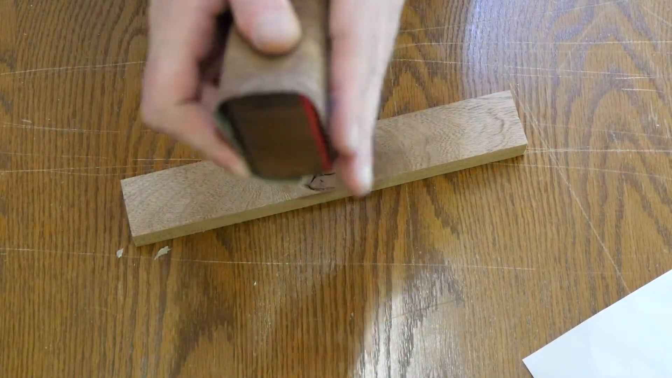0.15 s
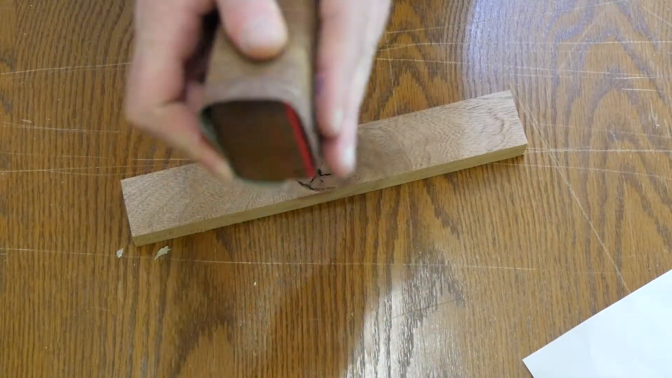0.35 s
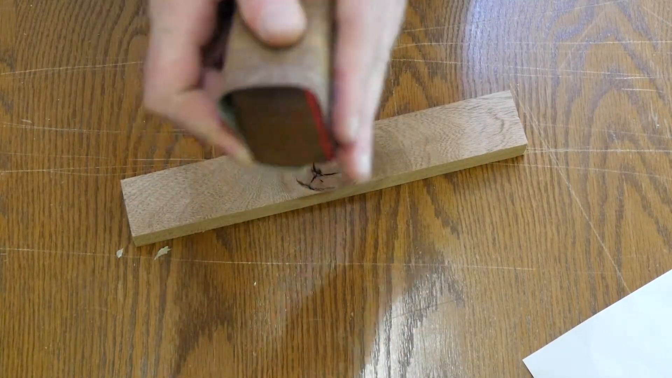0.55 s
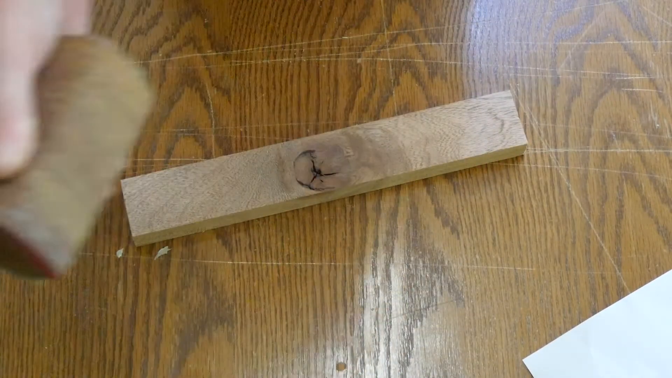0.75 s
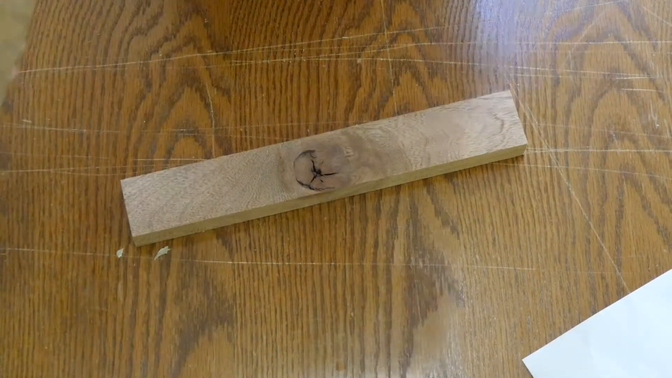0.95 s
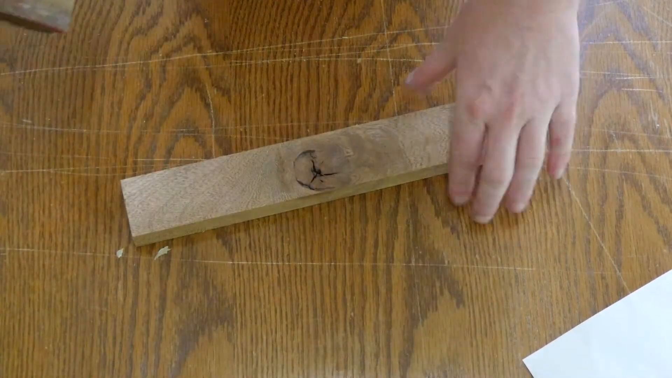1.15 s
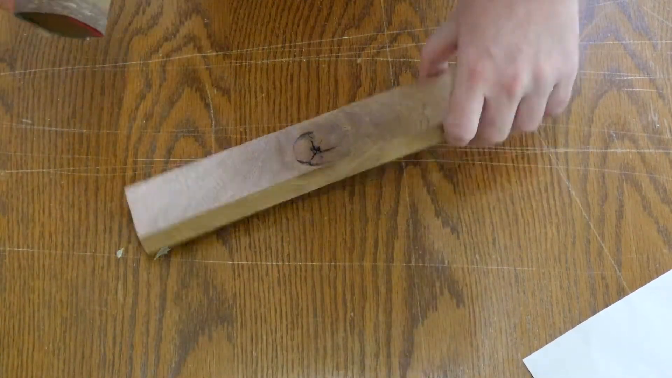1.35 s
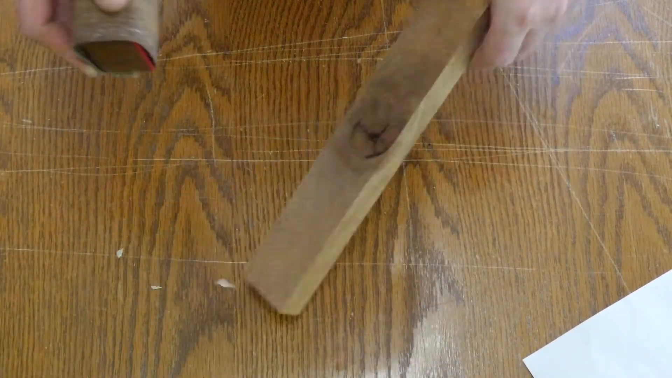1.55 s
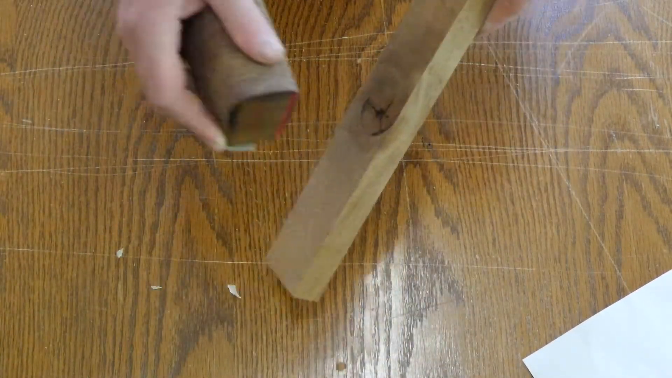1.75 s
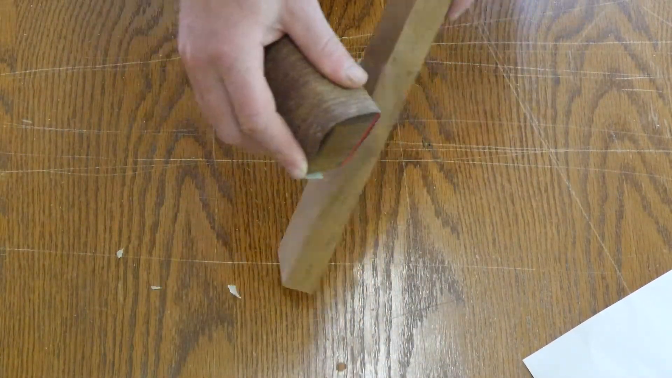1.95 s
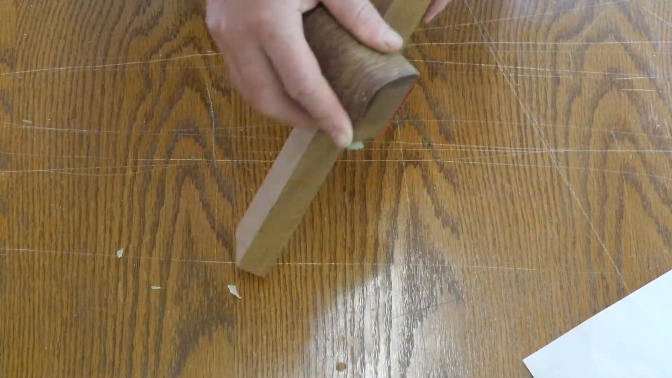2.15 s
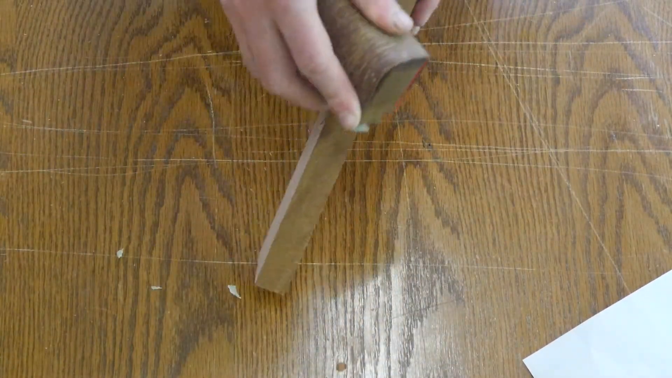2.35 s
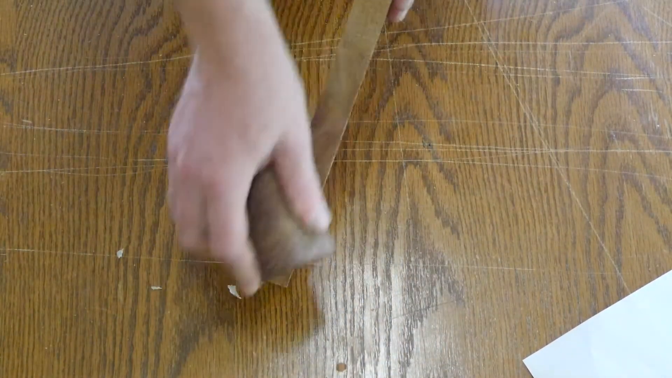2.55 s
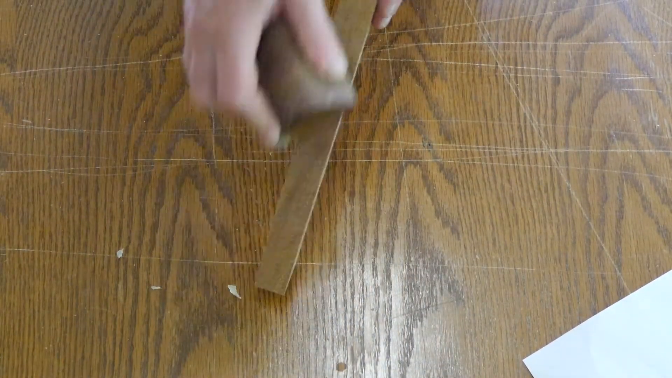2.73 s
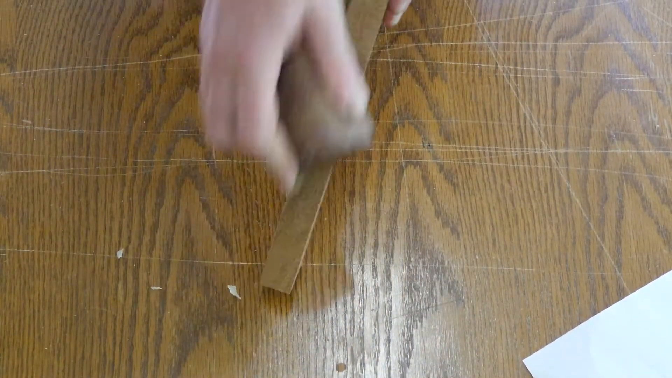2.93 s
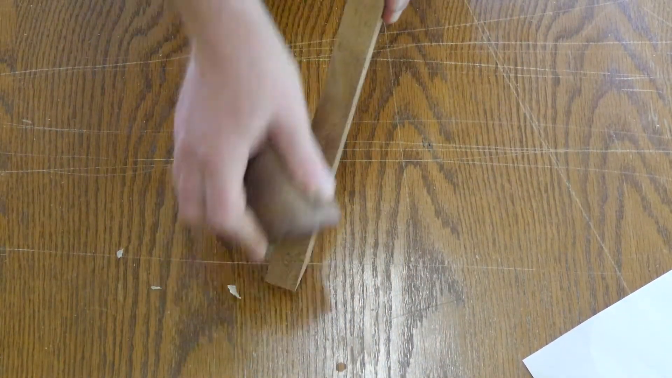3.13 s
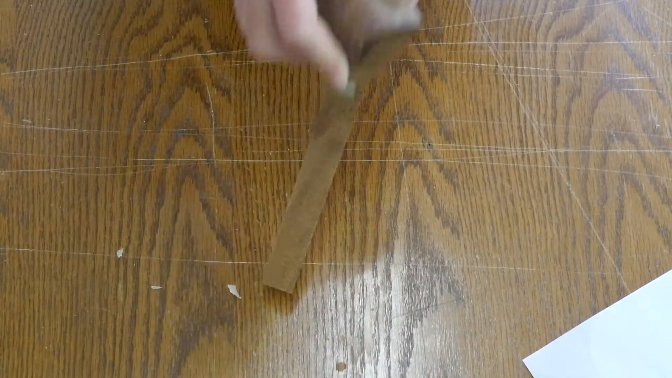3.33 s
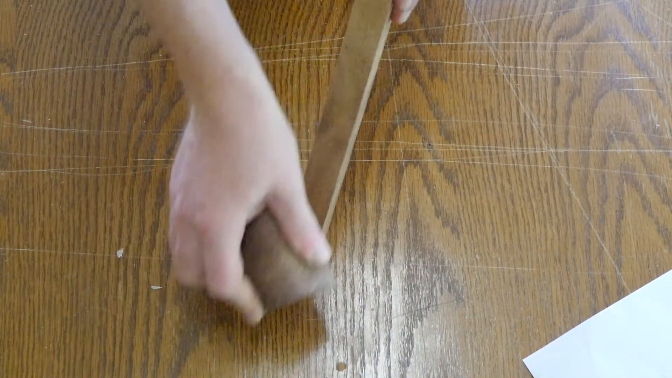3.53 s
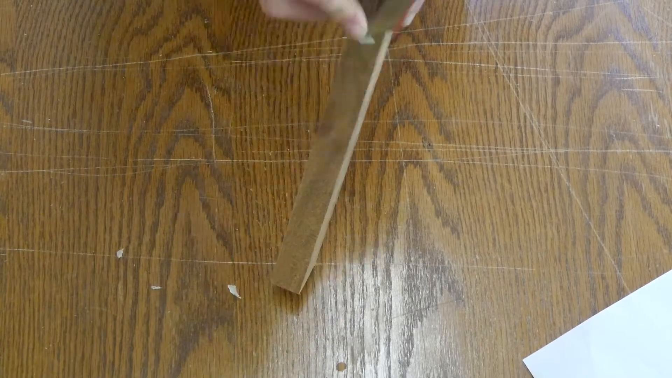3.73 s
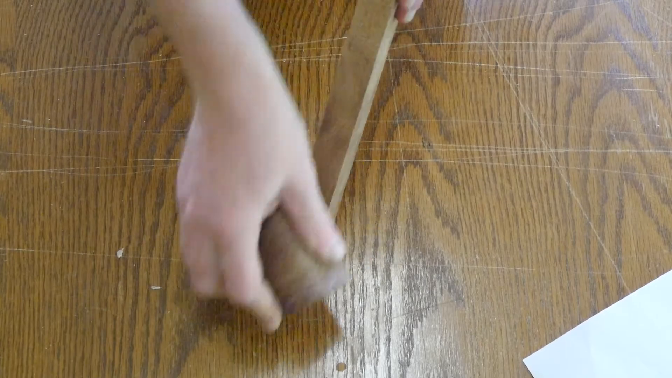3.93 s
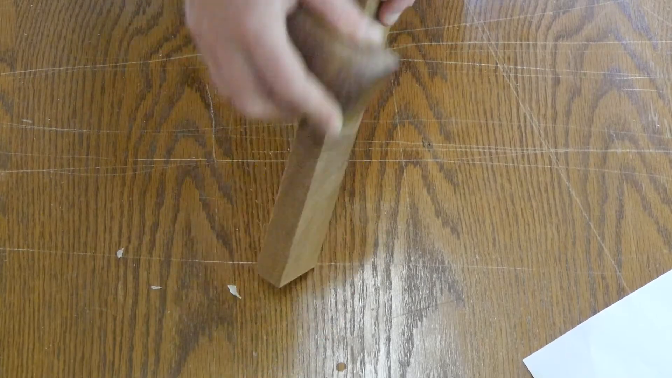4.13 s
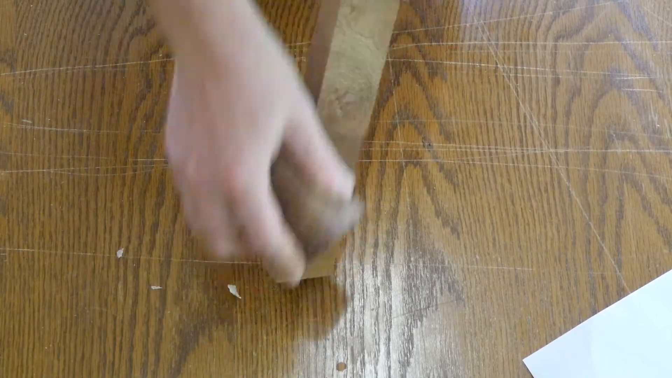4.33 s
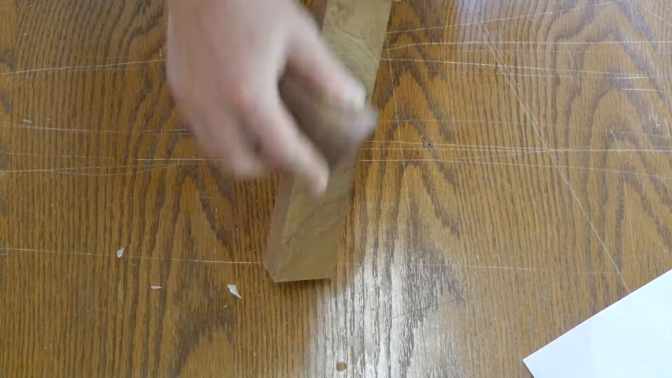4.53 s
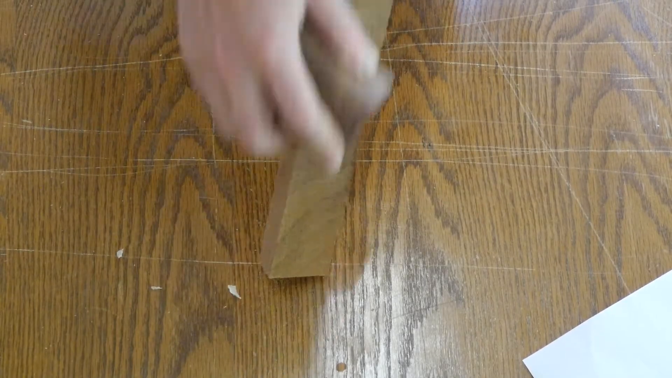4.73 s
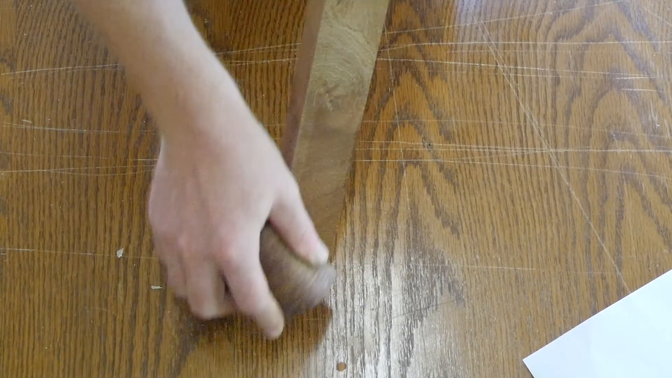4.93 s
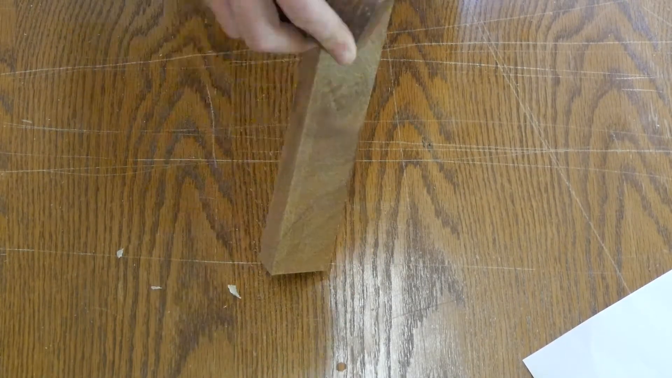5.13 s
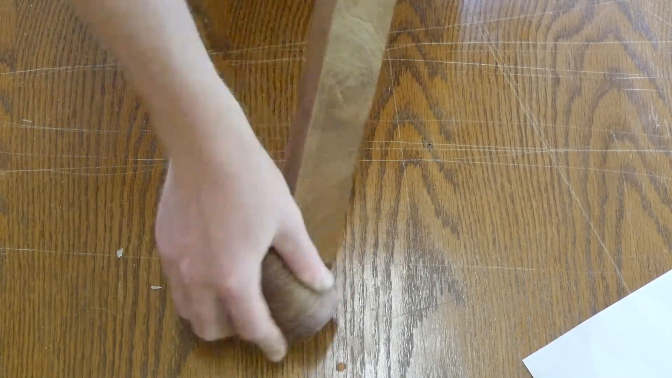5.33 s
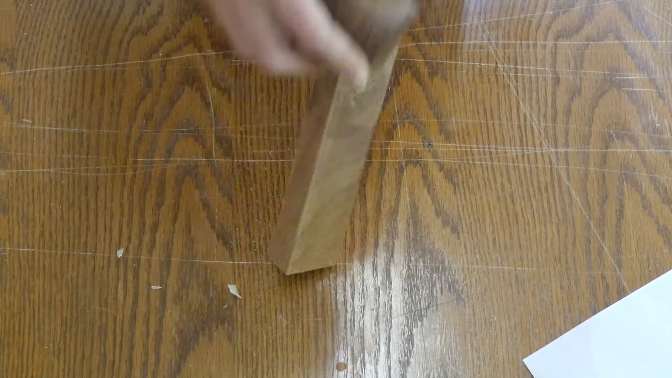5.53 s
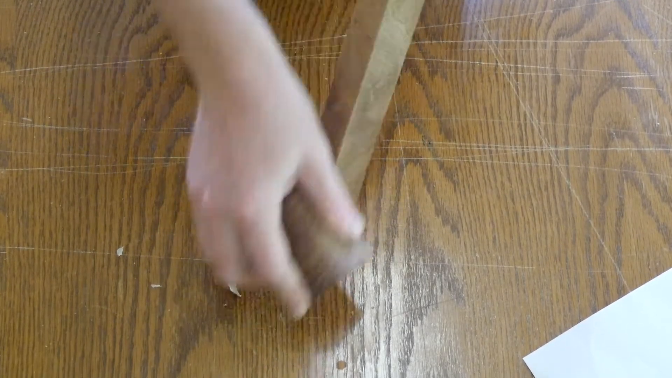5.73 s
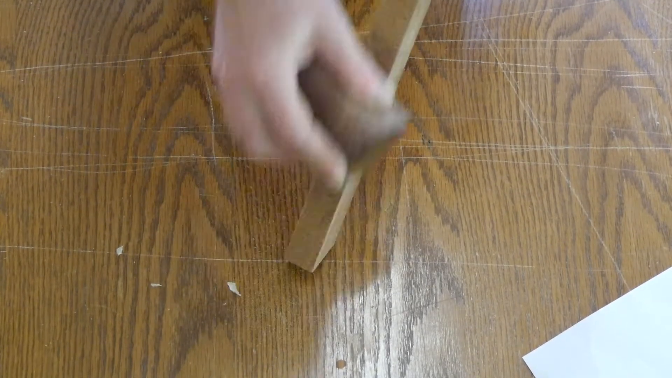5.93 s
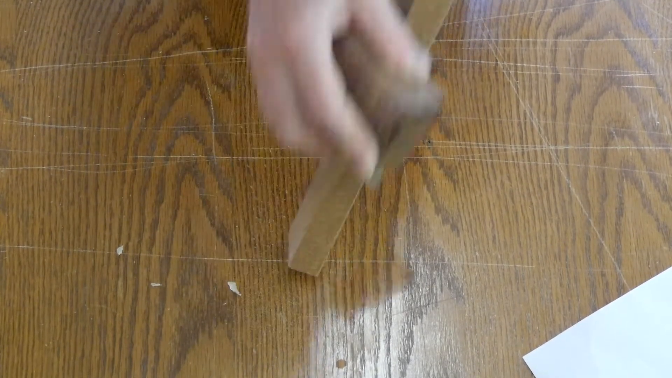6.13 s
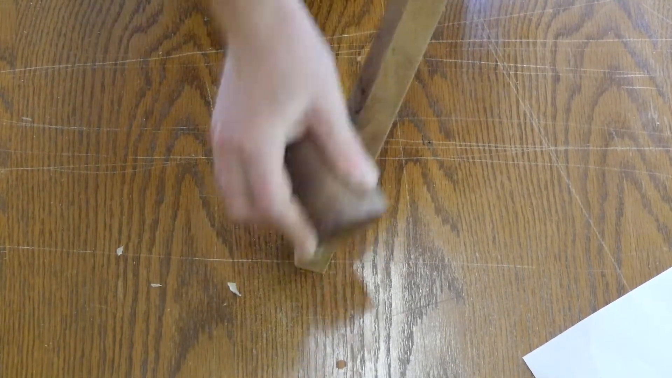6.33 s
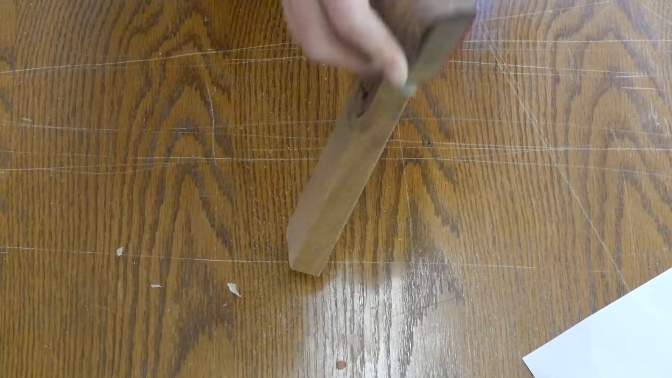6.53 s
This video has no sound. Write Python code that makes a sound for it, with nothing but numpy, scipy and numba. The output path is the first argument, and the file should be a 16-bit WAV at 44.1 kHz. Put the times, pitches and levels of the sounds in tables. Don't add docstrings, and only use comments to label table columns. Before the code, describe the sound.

A close microphone above a wooden table in a small, hard-walled workshop, with faint room tone. From 0.05 to 0.7 s a thumb brushes sandpaper in about seven short, dry, slightly hollow rubs, starting with a little tick; the last, near 0.6 s, is loudest and brightest. Near quiet follows. At 1.2-1.3 s come faint touches, then from 1.4 to 1.6 s a wooden strip's corner skids with small knocks and a stuttering scrape. At 1.8 s it is stood down with a loud, low woody knock. Around 2.15 s the block lands with a light gritty clack and shifts faintly. From 2.4 s to the end at roughly 6.6 s it strokes back and forth, about four strokes a second, hissing and rasping, brightest around 2.9-4.1 s, over a mid-pitched strip ring and low table hum. Softer thumps fall at 4.2 and 6.1 s, a strong knock at 5.3 s.

```python
import sys
import numpy as np
from scipy import signal
from scipy.fft import rfft, irfft, next_fast_len
from scipy.io import wavfile
from numba import njit

SR = 44100
rng = np.random.default_rng(int(sys.argv[2]) if len(sys.argv) > 2 else 0)


def field_ratio(decibels):
    return 10 ** (np.asarray(decibels, dtype=float) / 20)


def generate_wav(signal):
    frames = np.transpose(np.atleast_2d(signal))
    scaled = np.clip(frames, -1, 1) * 32767
    pcm = np.round(scaled).astype(np.int16)
    wavfile.write(sys.argv[1], SR, pcm)


N = 294588

# (start [s], share of the stroke at which the hand is fastest [0-1], grit hiss [dB], rasp [dB], strip ring [dB])
STROKES = [(2.388, 0.52, -29.5, -27, -18.5), (2.627, 0.42, -23.5, -22.5, -27),
           (2.865, 0.45, -20.5, -23.3, -23), (3.076, 0.49, -20, -23, -34), (3.316, 0.46, -21.5, -26, -30),
           (3.543, 0.49, -19, -25, -40), (3.775, 0.39, -20.5, -26, -51), (4.001, 0.51, -20.5, -26, -22),
           (4.236, 0.38, -26.5, -21, -24), (4.452, 0.51, -24.5, -23.5, -27), (4.693, 0.36, -24.5, -23, -28),
           (4.938, 0.62, -23.5, -25.5, -36), (5.158, 0.33, -24, -24.4, -27), (5.394, 0.63, -24, -26, -29.5),
           (5.623, 0.41, -24.5, -24, -25), (5.833, 0.39, -21.1, -28.5, -28),
           (6.066, 0.43, -24.5, -23.5, -36), (6.291, 0.39, -24, -26, -39), (6.532, 0.28, -22.5, -26, -37)]
# (frequency [Hz], level per Hz [dB])
GRIT_COLOUR = [(320, -76), (550, -5), (718, -9), (885, -1), (1060, 0.5), (1400, 5), (1810, 5), (2640, 0.5),
               (3080, 4), (6370, 0), (7860, 0), (10400, 5.5), (14500, -8.5), (15600, -5)]


def sanding():
    # (full at [s], fall by 20 dB [s], level [dB])
    landing = [
        (2.158, 0.19, -32),
        (2.195, 0.041, -40),
        (2.289, 0.058, -55),
    ]
    # (time [s], frequency [Hz])
    free_length = [(2.45, 1283), (2.75, 1460), (2.971, 1530), (3.2, 1390), (3.45, 1380), (3.66, 1500),
                   (3.9, 1350), (4.12, 1304), (4.35, 1406), (4.8, 1460), (5.05, 1410), (5.501, 1420),
                   (5.73, 1460), (5.95, 1360), (6.18, 1440), (6.6, 1490)]
    landing_hz = 1273

    place, through, speed = hand()
    strokes = range(len(STROKES))
    hiss_db, rasp_db, ring_db = (np.interp(place - 0.5, strokes, c) for c in np.transpose(STROKES)[2:])
    s, fall, db = np.transpose(landing)
    laid = swell(s, 0.002, 0, fall, db)

    free_hz = np.interp(np.arange(N) / SR, *np.transpose(free_length))
    free_hz = np.where(speed > 0, free_hz - 110 * np.cos(np.pi * through), landing_hz)
    upper_hz = np.where(speed > 0, 2450 + 200 * drift(10.3), 1.62 * landing_hz)

    grains = grit(20000.0, spread_db=-0.8, catch_db=1.0)
    spread = colour(grains, GRIT_COLOUR)
    rasp = signal.sosfiltfilt(signal.butter(1, 4300, fs=SR, output="sos"), spread)
    hiss = rms_one(spread - rasp)
    rasp = rms_one(rasp)
    upper = field_ratio(-7) * resonance(grains, upper_hz, 650.0)
    strip = field_ratio(-7.0) * resonance(grains, free_hz, 260.0)

    hiss_level = field_ratio(hiss_db - 1) * speed ** 3.08 + field_ratio(-28) * laid
    swelling_db = np.sin(2 * np.pi * (through - 0.5)) / 2
    rasp_level = field_ratio(rasp_db - 3 + swelling_db) * speed ** 1.17
    ring_level = field_ratio(ring_db - 1 + 5.5 * drift(11.0)) * speed ** 5.1 + field_ratio(2.5) * laid
    strokes_sound = hiss_level * hiss + rasp_level * rms_one(rasp + upper) + ring_level * strip
    return strokes_sound + laid * (upper + field_ratio(-11.5) * rasp)


def hand():
    last_stroke_s, start_s = 0.34, 0.016
    rest_speed = 0.28
    t, turns = np.arange(N) / SR, np.array(STROKES)[:, 0]
    place = np.interp(t, np.append(turns, turns[-1] + last_stroke_s), np.arange(len(turns) + 1.))
    which = np.minimum(place.astype(int), len(turns) - 1)
    through = place - which
    fastest = np.array(STROKES)[which, 1]
    arc = np.where(through < fastest, through / fastest, (1 - through) / (1 - fastest))
    speed = rest_speed + (1 - rest_speed) * np.sin(np.pi / 2 * arc)
    return place, through, speed * np.clip((t - turns[0]) / start_s, 0, 1)


def table():
    # (frequency [Hz], level [dB], fade by 60 dB [s])
    top_modes = [(141.7, -19, 0.18), (181.6, -10.5, 0.47), (251.4, -18, 0.42), (291.6, 0.5, 0.45),
                 (321.4, -2, 0.21), (369.4, -3.5, 0.18), (456, -48, 0.14), (516.6, -12.5, 0.42),
                 (623, -11, 0.026), (900, -19, 0.15), (1000, -13, 0.1), (1160, -34, 0.059),
                 (1650, -11, 0.052), (1960, -32, 0.028), (2310, -39, .03)]
    # (time [s], peak [dB], hardness of the contact [Hz])
    top_knocks = [(1.217, -32, 900.0), (1.264, -29, 900.0), (1.392, -19, 900.0), (1.498, -19.5, 900.0),
                  (1.803, 6, 980), (2.056, -18, 600.0), (2.313, -31, 900.0), (2.894, -50.5, 900.0),
                  (3.783, -27, 900.0), (4.188, -14.5, 900.0), (4.498, -49, 900.0), (5.324, 4.5, 810),
                  (6.141, -14, 900.0)]

    judder = grit(1500.0, spread_db=-0.5, catch_db=1.0)
    hum, knocks = np.zeros(N), np.zeros(N)
    for hz, db, t60 in top_modes:
        hum += field_ratio(db + 3.5 * drift(3.06)) * rms_one(ring(judder, hz, 0.5 * t60))
    for s, peak_db, hard_hz in top_knocks:
        at = round((s + 0.00326) * SR)
        click = np.zeros(min(SR // 2, N - at))
        click[0] = field_ratio(peak_db - 13.0)
        struck = np.zeros(len(click))
        for hz, db, t60 in top_modes:
            struck += field_ratio(db + rng.normal(0, 1.0)) * ring(click, hz, 0.5 * t60)
        soft = signal.butter(2, hard_hz, fs=SR)
        knocks[at:at + len(click)] += signal.lfilter(*soft, struck)

    force = push()
    hum = signal.lfilter(*signal.butter(2, 900, fs=SR), rms_one(hum))
    top_sound = force * hum + knocks
    legs = field_ratio(-35.5) * force * resonance(judder, 69.5, 40.0)
    leg_band = signal.butter(1, [45, 110], "band", fs=SR, output="sos")
    legs = legs + field_ratio(-17.0) * signal.sosfilt(leg_band, knocks)
    return signal.sosfilt(signal.butter(6, 125, "high", fs=SR, output="sos"), top_sound) + legs


def push():
    # (time [s], level [dB])
    pressure = [(2.0, -37.5), (2.27, -42.5), (2.36, -34.5), (2.6, -33.5), (3.6, -33), (3.9, -39),
                (4.15, -35.5), (4.35, -35), (5.1, -33), (5.6, -34.5), (6.0, -33.5), (6.4, -33), (6.68, -34)]
    # (full at [s], hold [s], fall by 20 dB [s], level [dB])
    lurches = [(1.267, 0.017, 0.051, -40.5), (1.409, 0.054, 0.027, -31), (1.503, .001, 0.15, -26.5),
               (1.825, 0.032, 0.19, -22), (2.32, 0.031, .05, -45), (2.892, .001, 0.054, -25.5),
               (3.347, .001, 0.097, -25), (3.787, 0.016, 0.04, -25.5), (4.19, .02, 0.9, -31.5),
               (4.39, .001, .15, -38), (4.513, .001, 0.037, -31), (4.6, .001, 0.09, -31),
               (5.36, .02, 0.29, -26.5), (6.125, 0.053, 0.19, -43), (6.562, .001, 0.28, -33.5)]
    s, db = np.transpose(pressure)
    steady = field_ratio(np.interp(np.arange(N) / SR, s, db, left=-120, right=-120))
    s, hold, fall, db = np.transpose(lurches)
    return np.hypot(steady, swell(s, 0.017, hold, fall, db))


def drag():
    # (full at [s], rise by 20 dB [s], fall by 20 dB [s], scrape level [dB])
    skids = [
        (1.28, 0.049, .035, -55),
        (1.378, .012, .08, -54),
        (1.456, 0.04, 0.052, -34.5),
        (1.542, 0.11, 0.11, -43.5),
        (1.62, 0.087, 0.65, -55.5),
    ]
    # (frequency [Hz], level per Hz [dB])
    skid_colour = [(410, -19), (700, -8), (1470, -8), (2340, -6), (3490, -17), (4130, -13), (5080, -28),
                   (9850, -24), (15500, -33)]
    # (frequency [Hz], width [Hz], level [dB])
    skid_rings = [(920, 200, 2), (1720, 350, -5), (2360, 300, 5), (4280, 700, -8)]
    grains = grit(4000.0, spread_db=3.5, catch_db=1.0)
    rings = sum(field_ratio(db) * resonance(grains, hz, float(width)) for hz, width, db in skid_rings)
    scrape = rms_one(colour(grains, skid_colour)) + field_ratio(-3) * rms_one(rings)
    s, rise, fall, db = np.transpose(skids)
    return swell(s, rise, 0, fall, db) * rms_one(scrape)


def thumb():
    # (full at [s], rise by 20 dB [s], hold [s], level [dB], hollow of the hand [Hz])
    brushes = [
        (0.063, 0.011, 0.014, -35.5, 1520),
        (0.112, 0.038, 0.026, -46.5, 1440),
        (.215, 0.05, 0.043, -33.5, 1510),
        (0.347, 0.055, 0.025, -34, 1430),
        (0.435, 0.03, 0.018, -41, 1460),
        (0.524, 0.013, 0.038, -34, 1650),
        (0.624, 0.04, 0.064, -27.5, 1960),
    ]
    # (frequency [Hz], level per Hz [dB])
    skin_colour = [(320, -43), (550, 0.5), (900, 6), (1750, -1.5), (3200, 1.5), (7300, -9), (10200, -3),
                   (15500, -17)]
    opening_hz_per_s, fall_s = 6700, 0.026
    s, rise, hold, db, hz = np.transpose(brushes)
    t = np.arange(N) / SR
    which = np.clip(np.searchsorted(s - rise, t) - 1, 0, len(s) - 1)
    hollow_hz = hz[which] + opening_hz_per_s * np.clip(t - (s + hold / 2)[which], -0.05, 0.05)
    grains = grit(20000.0, spread_db=2.5, catch_db=0.9)
    skin = rms_one(colour(grains, skin_colour))
    low = signal.sosfiltfilt(signal.butter(2, 1300, fs=SR, output="sos"), skin)
    skin = skin - low + low * field_ratio(-27 * (hz[which] - 1500) / 1000)
    rub = skin + field_ratio(-8.5) * resonance(grains, hollow_hz, 1360.0)
    return swell(s, rise, hold, fall_s, db) * rms_one(rub)


def ticks():
    # (time [s], peak [dB], paper crackle [dB])
    contacts = [
        (0.0628, -21.5, -50),
        (1.3957, -35, -48),
        (1.4336, -29, -58),
        (1.4556, -47, -64),
        (1.8038, -16, -39.5),
        (2.1565, -21.5, -50),
        (2.2904, -38, -38.5),
        (2.3461, -55, -43),
        (2.373, -60, -48),
    ]
    # (frequency [Hz], level [dB], fade by 60 dB [s])
    contact_rings = [(1164, 14, 0.059), (2110, 13, 0.021), (3020, -1, .025), (6270, 1, 0.022),
                     (9250, -24, 0.0099)]
    clicks, snaps = np.zeros((2, N))
    at = (np.array(contacts)[:, 0] * SR).astype(int)
    clicks[at], snaps[at] = field_ratio(np.array(contacts)[:, 1:].T)
    crack = fading(clicks, 0.0015) * rng.standard_normal(N)
    crack = signal.lfilter(*signal.butter(2, 9000, fs=SR), crack)
    paper = colour(rng.standard_normal(N), GRIT_COLOUR)
    paper = signal.lfilter(*signal.butter(2, 4500, "high", fs=SR), paper)
    rustle = fading(snaps, 0.0036) * rms_one(paper)
    rings = sum(field_ratio(db - 26.5) * ring(clicks, hz, t60) for hz, db, t60 in contact_rings)
    return rustle + field_ratio(-23) * crack + rings


def workshop(x):
    # (frequency [Hz], fade by 60 dB [s])
    room_fade = [(200, 0.35), (1000, 0.74), (2500, 0.56), (4500, 0.83), (8000, 0.48), (13000, 0.49)]
    edges_hz = 60 * 2 ** np.arange(0, 8.3, 0.5)
    t = np.arange(SR) / SR
    tails = np.zeros((2, SR))
    for low, high in zip(edges_hz, edges_hz[1:]):
        band = signal.butter(2, [low, high], "band", fs=SR, output="sos")
        noise = signal.sosfilt(band, rng.standard_normal((2, SR)))
        tails += noise * field_ratio(-60 * t / at_hz(room_fade, np.sqrt(low * high)))
    tails *= np.clip(t / 0.0014 - 1, 0, 1)
    tails /= np.sqrt(np.sum(tails ** 2, axis=1, keepdims=True))
    return diffuse(*signal.fftconvolve(x[None], tails, axes=1)[:, :N])


def air():
    # (frequency [Hz], level per Hz [dB])
    room_tone = [(18, -63), (30, -9), (71, -19), (181, -3), (306, -5.5), (358, -4.5), (418, -3.5),
                 (762, -10), (1130, -15), (1760, -17.5), (1900, -19), (7970, -32), (10100, -26),
                 (14100, -37), (15300, -40)]
    mid, side = (rms_one(colour(rng.standard_normal(N), room_tone)) for _ in range(2))
    return field_ratio(-51) * diffuse(mid, side)


def diffuse(mid, side):
    # (frequency [Hz], level [dB])
    port_spread = [(60, 4), (150, -39), (380, -20.5), (950, -1.5), (2380, 0.5), (5980, -0.5), (15000, -5.5)]
    side = colour(side, port_spread)
    return np.array([mid + side, mid - side])


def grit(per_s, spread_db, catch_db):
    born = rng.random(N) < per_s / SR
    sizes = field_ratio(spread_db * np.minimum(rng.exponential(1, N), 4)) * rng.standard_normal(N)
    return rms_one(born * sizes * field_ratio(catch_db * drift(51.0)))


def swell(full_at, rise, hold, fall, level_db):
    t = np.arange(N) / SR
    out = np.zeros(N)
    for s, up, stay, down, db in np.broadcast(full_at, rise, hold, fall, level_db):
        near = slice(int(max(s - 3 * up, 0) * SR), int((s + stay + 3 * down) * SR))
        early = np.maximum(s - t[near], 0)
        late = np.maximum(t[near] - s - stay, 0)
        out[near] += field_ratio(db - 20 * early / up - 20 * late / down)
    return out


def ring(clicks, hz, t60):
    r, w = field_ratio(-60 / (t60 * SR)), 2 * np.pi * hz / SR
    return signal.lfilter([0, np.sin(w)], [1, -2 * r * np.cos(w), r * r], clicks + 1e-18)


def fading(clicks, seconds):
    return signal.lfilter([1], [1, -np.exp(-1 / (seconds * SR))], clicks)


@njit
def gliding(x, hz, width, rate):
    out, r = np.zeros(len(x)), np.exp(-np.pi * width / rate)
    for i in range(2, len(x)):
        turn = 2 * r * np.cos(2 * np.pi * hz[i] / rate)
        out[i] = x[i] - x[i - 2] + turn * out[i - 1] - r * r * out[i - 2]
    return out


def resonance(x, hz, width):
    track = hz + np.zeros(N)
    once = gliding(x, track, width, float(SR))
    return rms_one(gliding(once, track, width, float(SR)))


def drift(rate):
    r = np.exp(-80 * np.pi * rate / SR)
    slow = signal.lfilter([1], [1, -2 * r, r * r], rng.standard_normal(N // 40 + 2002))[2000:]
    return np.interp(np.arange(N) / 40, np.arange(len(slow)), rms_one(slow))


def colour(x, points):
    size = next_fast_len(len(x))
    hz = np.maximum(np.arange(size // 2 + 1) * SR / size, 10)
    return irfft(rfft(x, size) * field_ratio(at_hz(points, hz)), size)[:len(x)]


def at_hz(points, hz):
    point_hz, value = np.transpose(points)
    return np.interp(np.log(hz), np.log(np.maximum(point_hz, 10)), value)


def rms_one(x):
    return x / np.sqrt(np.mean(x ** 2) + 1e-20)


def scene():
    bright = sanding() + drag() + thumb() + ticks()
    low = table()
    low_to_walls = signal.lfilter(*signal.butter(2, 260, "high", fs=SR), low)
    wet = field_ratio(-7.0) * workshop(bright + field_ratio(0.5) * low_to_walls)
    left_right = field_ratio(np.array([[0.25], [-0.25]]))
    return bright * left_right + low + wet + air()


def low_pass(x):
    return signal.sosfilt(signal.butter(12, 15830, fs=SR, output="sos"), x)


def record(dry):
    x = signal.sosfilt(signal.butter(1, 91, "high", fs=SR, output="sos"), dry)
    x = signal.lfilter(*signal.iirnotch(7900, 40.0, fs=SR), x)
    x = signal.sosfilt(signal.cheby2(12, 70, 16250, fs=SR, output="sos"), x)
    x = x / (1 + np.abs(x / 0.96) ** 6) ** (1 / 6)
    x = signal.sosfilt(signal.butter(2, 45, "high", fs=SR, output="sos"), x)
    return low_pass(x)


dry = scene()
out = record(dry)
generate_wav(out)
```